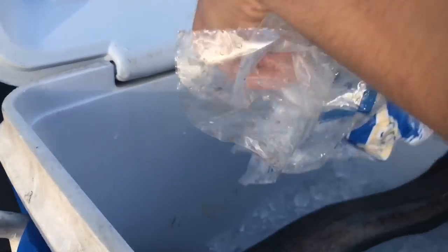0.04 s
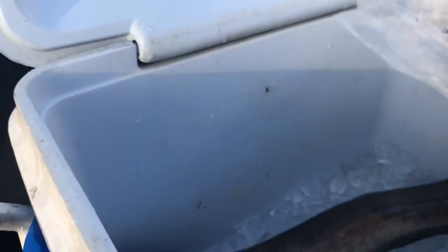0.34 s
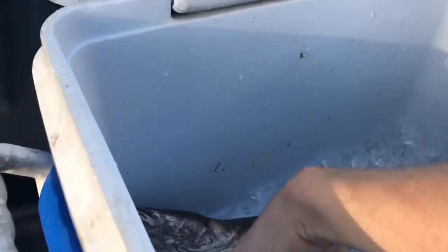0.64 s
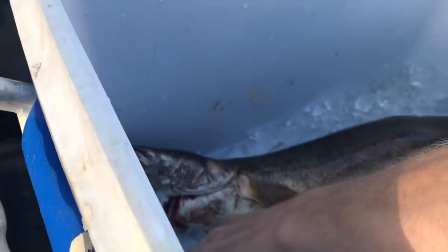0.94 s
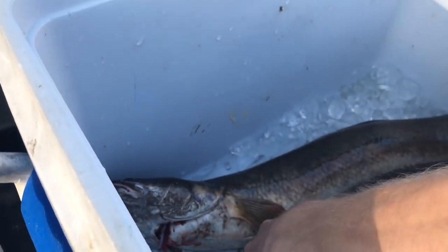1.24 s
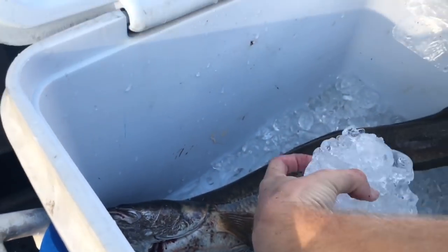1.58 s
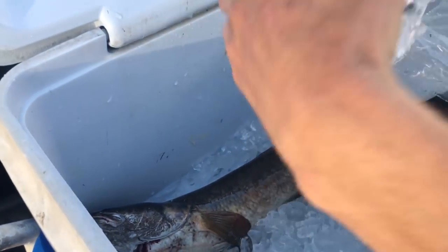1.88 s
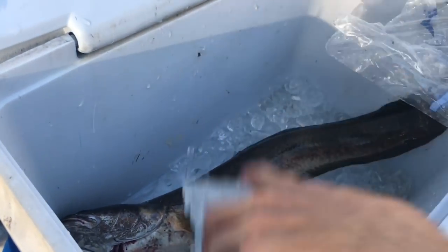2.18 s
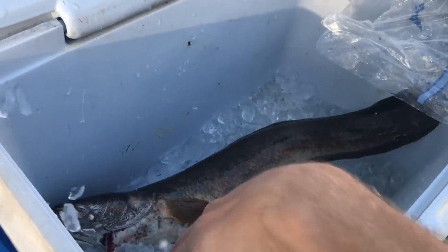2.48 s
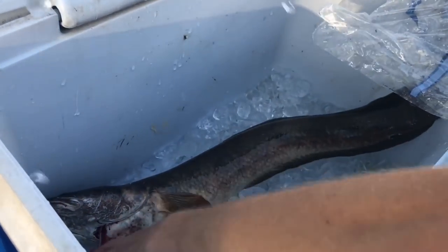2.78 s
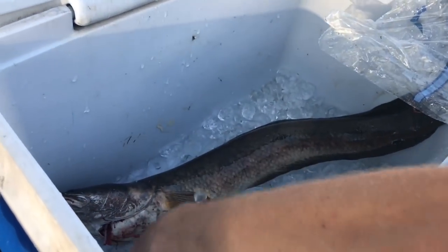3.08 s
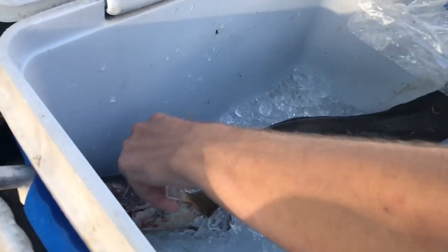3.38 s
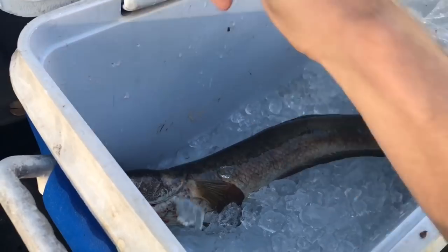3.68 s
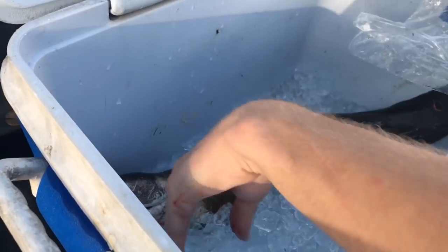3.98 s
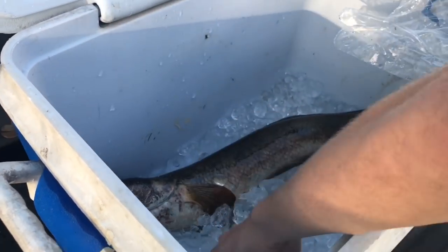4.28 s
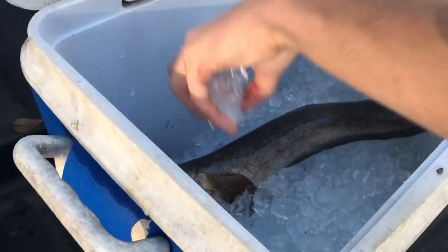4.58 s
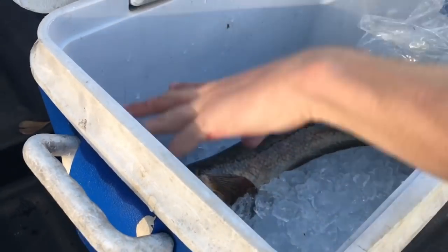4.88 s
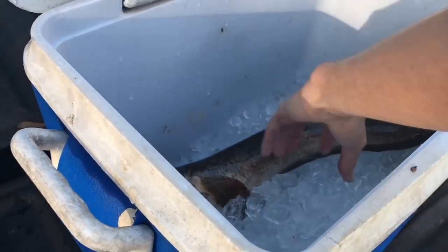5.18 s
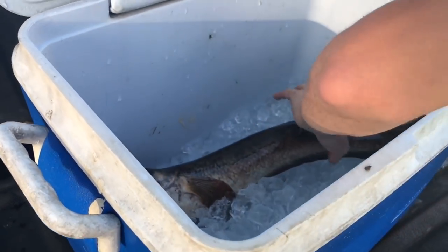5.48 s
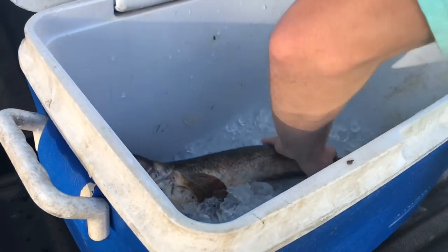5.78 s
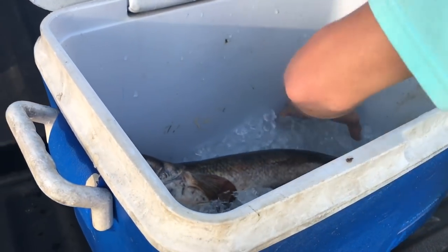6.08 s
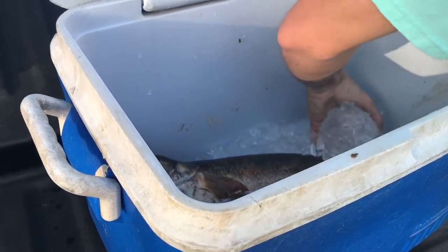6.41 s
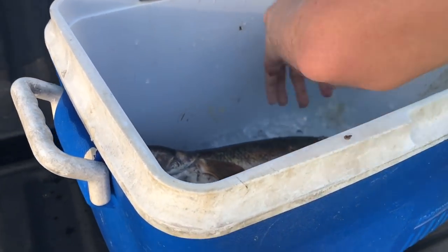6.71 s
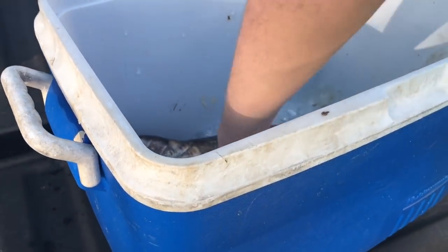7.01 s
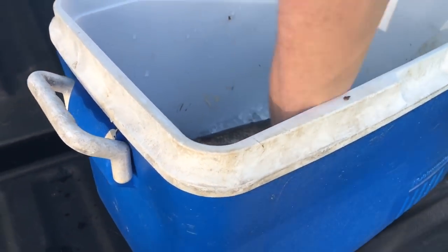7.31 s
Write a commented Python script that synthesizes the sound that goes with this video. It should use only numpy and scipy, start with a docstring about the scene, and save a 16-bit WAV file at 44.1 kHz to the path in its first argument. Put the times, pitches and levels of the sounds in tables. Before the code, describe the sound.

A hand scoops wet ice cubes in a plastic cooler, heard from close above, outdoors. In the first second an ice bag gives a few light crinkling ticks, and a low hum and airy rush fade by about 2 seconds, leaving faint open air. Crunchy digging starts near 0.4 seconds and grows around 1.1, with soft knocks on the tub. At 2.3 seconds a handful lands with a sharp clatter and a hollow thump, and loose cubes clink and skitter through more crunching until about 3.2. A second handful hits just before 4 seconds with the heaviest thump. After a short scoop, a third lands at 4.9. Following a brief lull, digging resumes from about 5.6 seconds to the end at roughly 7.5, in repeated, slightly hollower crunching strokes with scattered clinks and dull bumps on the plastic.

```python
"""Wet ice cubes, scooped by hand in a plastic cooler; three handfuls are tossed over a fish.
The bed crunches in thousands of small contacts, single cubes clink, and the hollow tub knocks
under the weight. Bright ticks come first from the crinkling ice bag, then from splitting chips.
Behind it: open air, with a low hum and a rush that fade in the first two seconds."""
import sys
import numpy as np
from scipy import signal
from scipy.fft import rfft, irfft
from scipy.io import wavfile

SR = 44100
rng = np.random.default_rng(int(sys.argv[2]) if len(sys.argv) > 2 else 0)


def unload_wav(signal):
    """Save mono or channel-first audio to the path in sys.argv[1] as 16-bit WAV at rate SR, clipped to [-1, 1]."""
    wavfile.write(
        sys.argv[1],
        SR,
        np.round(np.clip(np.atleast_2d(signal).T, -1, 1) * 32767).astype(np.int16),
    )


N = 328545
TIME_S = np.arange(N) / SR

# background spectra: f/Hz, level/dB
AIR_SPECTRUM = [(15, -21), (50, -4.5), (152, -5), (437, -21), (1280, -22.5), (4950, -40), (15800, -45)]
RUSH_SPECTRUM = [(40, -31), (130, -4.5), (430, -10.5), (1600, -10.5), (4000, -24), (16000, -39)]
# hand strokes, on the bag, then in the ice:
# t/s, rise/s, length/s, crunch/dB, fizz/dB re crunch, push on the tub/dB re crunch
STROKES = [(0, 0.0043, 0.027, -42.5, 2, -3), (0.378, 0.072, .13, -32, -5.5, -6.5),
           (0.853, 0.012, 0.14, -33, -8, -3), (1.094, 0.079, 0.16, -26, -2.5, -2.5),
           (1.382, 0.051, 0.048, -29.5, -4.5, 2.5), (1.48, 0.016, 0.17, -43, -1.5, 1.5),
           (2.365, 0.15, 0.34, -33.5, -4, -3), (2.55, 0.017, 0.33, -32.5, -16, -7.5),
           (2.859, 0.016, 0.053, -22.5, -14.5, -11), (2.958, 0.045, 0.12, -26.5, -6, -4.5),
           (3.102, 0.039, 0.089, -34.5, -4, 0), (3.97, 0.015, 0.59, -47.5, -3.5, 4.5),
           (4.352, 0.14, 0.058, -25.5, -9, -1), (5.084, 0.023, 0.05, -42.5, -6, -9),
           (5.311, 0.13, 0.098, -43, -11, -16), (5.644, 0.019, 0.055, -29, -4.5, -6.5),
           (5.767, 0.073, 0.13, -27.5, -3.5, -2.5), (6.126, 0.016, 0.085, -23.5, -6.5, -4),
           (6.297, 0.11, 0.15, -26, -6, -3), (6.483, 0.028, 0.19, -33, -0.5, -0.5),
           (6.675, 0.0087, 0.12, -26, -10, 0), (7.109, 0.03, 0.086, -25, -13, -3),
           (7.273, 0.28, 0.15, -25.5, -8, -5)]
# filters for coarse and fine ice contacts: f/Hz, gain/dB
CRUNCH_EQ = [(200, -12.5), (400, -11.5), (750, 0.5), (1500, 1), (2800, 1.5), (4500, -3.5), (6500, -4.5),
             (8000, -19), (11000, -21), (16000, -90)]
FIZZ_EQ = [(4000, 5.5), (7000, -2), (9000, -1), (10400, -6), (12000, -3.5), (15800, -5.5)]
# tub modes: f/Hz, level/dB, t60/s
TUB_MODES = [(66.7, 4.5, 0.24), (126, 4.5, 0.12), (159, 6.5, 0.087), (204.7, 4.5, 0.13), (228, 4.5, 0.13),
             (267.3, 5, 0.058), (303.5, 3.5, 0.087), (372, -1.5, 0.2), (426, 2, 0.2), (733, -3.5, 0.39),
             (925, -14, 0.1), (1300, 0.5, 0.14)]
# ticks of bag and chips: t/s, level/dB
TICKS = [(0.037, -33), (0.186, -46), (0.29, -36), (0.585, -36), (0.648, -30), (0.725, -26), (2.222, -32.5),
         (2.241, -27.5), (2.563, -18), (2.652, -28), (3.145, -26), (3.248, -35.5), (3.467, -40.5),
         (3.509, -39.5), (3.833, -47), (3.89, -34), (4.143, -32), (6.082, -34.5), (6.742, -21.5)]
# cubes striking or cracking: t/s, level/dB, ring f/Hz, snap sharpness/dB
CLINKS = [(0.528, -28, 3800, -26), (0.54, -27.5, 4500, -14), (0.642, -25, 4230, -4.5),
          (0.712, -25.5, 8900, -6), (1.115, -19.5, 3750, -26), (1.152, -18.5, 5450, -6),
          (1.407, -22.5, 4340, -7), (1.66, -27, 2450, -11.5), (1.679, -25, 3100, -24.5),
          (1.707, -30, 4650, -10), (1.747, -27, 3060, -12), (1.972, -44, 1470, -10),
          (2.329, -10.5, 1980, -16), (2.451, -24, 2420, -29), (2.462, -21, 2580, -34),
          (2.485, -16.5, 4700, -9.5), (2.55, -21.5, 3650, -14), (2.588, -19, 4340, -8),
          (2.6, -14.5, 2250, -12.5), (2.613, -26, 3600, -10), (2.67, -14.5, 4900, -13),
          (2.682, -22, 4140, -25), (2.694, -15, 4320, -12), (2.71, -21.5, 5500, -5), (2.727, -22, 4800, -3),
          (2.74, -15, 3100, -17), (2.774, -18, 3240, -18), (2.779, -23.5, 3020, -3), (2.8, -22, 2250, -13),
          (2.844, -22, 2430, -14), (2.86, -14.5, 1640, -14), (2.866, -17, 4170, -18),
          (2.882, -22.5, 1720, -5), (3.026, -17.5, 3140, -15), (3.405, -37.5, 2280, -13),
          (3.87, -18.5, 2650, 1.5), (3.946, -8, 2330, -13), (4.084, -26.5, 2270, -21),
          (4.16, -31, 1970, -12), (4.209, -22.5, 2320, -8), (4.23, -30, 2800, -10),
          (4.248, -30.5, 2000, -11), (4.27, -26, 1600, -7), (4.32, -26.5, 3220, -10),
          (4.898, -8.5, 2900, -11.5), (4.962, -47, 3330, -18), (5.086, -30, 2650, -17),
          (6.492, -22, 3000, -5), (6.696, -19, 1700, -9), (6.799, -28, 5000, -16),
          (6.833, -26.5, 1900, -22), (7.111, -23, 1300, -23), (7.15, -17, 1540, -14)]
# blows on the tub: t/s, ring peak/dB, f/Hz of the struck spot, factor on the modes' t60
KNOCKS = [(0.883, -18.5, 232, 1.1), (1.085, -20, 220, 1.4), (1.262, -18, 263, 2.1),
          (1.405, -12.5, 225, 1.4), (1.676, -26.5, 666, 0.36), (2.319, -7.5, 230, 0.16),
          (2.336, -5.5, 178, 2.6), (2.382, -14.5, 64, 0.74), (2.862, -16, 1010, 0.13),
          (3.052, -17, 243, 2.5), (3.871, -19, 950, 0.27), (3.948, -2, 162, 1.9), (3.952, -6.5, 295, 0.72),
          (4.894, -19.5, 74, 1.8), (4.898, -10.5, 282, 0.86), (4.916, -10, 237, 1.6),
          (4.963, -13.5, 960, 0.35), (5.816, -18.5, 174, 0.6), (6.193, -13.5, 625, 0.37),
          (6.677, -15, 420, 1.8), (6.796, -13, 232, 0.5), (7.16, -19, 720, 0.38)]
# handfuls landing: t/s, level/dB, rise/s, hold/s, t60/s
HANDFULS = [(2.3256, -13, 0.0032, 0.0088, 0.39), (3.94, -18, 0.0075, 0.0048, 0.44),
            (4.8873, -17.5, 0.00091, 0.013, 0.21)]


def amp(db):
    """Decibels to gain."""
    return 10 ** (np.asarray(db) / 20)


def unit(x):
    """Scales to rms 1."""
    return x / np.sqrt(np.mean(x ** 2) + 1e-20)


def add(mix, at_s, sound):
    """Mixes a sound in."""
    part = mix[max(round(at_s * SR), 0):][:len(sound)]
    part += sound[:len(part)]


def decay(age_s, t60_s):
    """Exponential fall, 60 dB per t60."""
    return np.exp(-np.log(1000) * age_s / t60_s)


def colour(x, points, size=4096):
    """Minimum-phase filter through (f/Hz, gain/dB) points; attacks stay sharp."""
    hz, db = np.transpose(points)
    bin_hz = abs(np.fft.fftfreq(size, 1 / SR))
    log_gain = np.log(amp(np.interp(np.log(bin_hz + 1), np.log(hz + 1), db)))
    taps = np.fft.ifft(np.exp(np.conj(signal.hilbert(log_gain)))).real
    return signal.oaconvolve(x, taps[:size // 2])[:len(x)]


def wander(band_hz):
    """Smooth random curve, rms 1."""
    lowpass = np.exp(-(np.fft.rfftfreq(N, 1 / SR) / band_hz) ** 2)
    return unit(irfft(rfft(rng.standard_normal(N)) * lowpass, N))


def swell(at_s, peak_db, width_s, fall_db):
    """Level in dB: one peak, then an ever slower fade."""
    return peak_db - fall_db * np.log10(1 + ((TIME_S - at_s) / width_s) ** 2)


def ring(hz, t60_s, count):
    """One damped mode."""
    t = np.arange(count) / SR
    return np.sin(2 * np.pi * hz * t) * decay(t, t60_s)


def outdoors(hum_hz=65):
    """Low, uneven open air; a rush and a wavering hum fade away."""
    air = amp(-44.5 + wander(6.1)) * unit(colour(rng.standard_normal(N), AIR_SPECTRUM))
    rush_db = swell(at_s=-0.33, peak_db=-33.5, width_s=0.98, fall_db=19.5) + wander(28)
    rush = unit(colour(rng.standard_normal(N), RUSH_SPECTRUM))
    turns = np.cumsum(hum_hz * (1 + 0.0422 * wander(9.13))) / SR
    hum = unit(np.sin(2 * np.pi * turns) + 0.66 * np.sin(4 * np.pi * turns))
    hum_db = swell(at_s=0.93, peak_db=-37, width_s=0.5, fall_db=11) + 2 * wander(12)
    return air + amp(rush_db) * rush + amp(hum_db) * hum


def stroke_levels(release_t60_s=0.39, settle_t60_s=0.88, rest_db=(-64, -67.5, -66.5)):
    """Crunch, fizz and push in dB: each stroke builds, holds and lets go, then the bed settles."""
    t = TIME_S[::64]
    crunch, fizz, push = (np.full(len(t), amp(db) ** 2) for db in rest_db)
    for start_s, rise_s, length_s, db, fizz_db, push_db in STROKES:
        press = amp(db) * (1 + np.tanh(2 * (t - start_s) / rise_s)) / 2
        after_s = np.maximum(t - start_s - length_s, 0)
        release, settle = decay(after_s, release_t60_s), decay(after_s, settle_t60_s)
        coarse = press * np.maximum(release, amp(-14.5) * settle)
        fine = press * np.maximum(release, amp(-5) * settle)  # settling is richer in fine chips
        crunch += coarse ** 2
        fizz += (amp(fizz_db) * fine) ** 2
        push += (amp(push_db) * coarse) ** 2
    return [np.interp(TIME_S, t, 10 * np.log10(power)) for power in (crunch, fizz, push)]


def walls(x, wet_db=-4, t60_s=0.058, count=4000):
    """Quick echoes off the close plastic walls, different for each spot."""
    t = np.arange(count) / SR
    taps = rng.standard_normal(count) * (rng.random(count) < 0.12)
    taps *= (t > 0.0012) * decay(t, t60_s)
    taps *= amp(wet_db) / np.linalg.norm(taps)
    taps[0] = 1
    return signal.oaconvolve(x, taps)[:len(x)] / np.linalg.norm(taps)


def contacts(per_s, spread_db, band_hz, cycles, sizes=24):
    """Ice chips of many sizes collide and ring briefly; most hits are light, a few hard."""
    force = amp(spread_db * np.minimum(rng.exponential(1, N), 4)) * rng.choice([-1, 1], N)
    force *= (rng.random(N) < per_s / SR) / np.sqrt(per_s)
    chip_size, out = rng.integers(0, sizes, N), np.zeros(N)
    for size, hz in enumerate(np.linspace(*np.sqrt(band_hz), sizes) ** 2):
        tone = ring(hz, cycles / hz, count=3000)
        tone /= np.linalg.norm(tone)
        tone[0] += 0.6  # bare contact tick
        out += signal.oaconvolve(force * (chip_size == size), walls(tone))[:N] * hz ** 0.25
    return out


def tumbling(stir, max_per_s=260, spread_db=2.5, count=1500):
    """Whole cubes grind past each other under a hard push: short scrapes, each with its own pitch."""
    out, t = np.zeros(N), np.arange(count) / SR
    for when, pitch, force, chance in rng.random((int(max_per_s * N / SR), 4)):
        hz = 1000 * 6 ** pitch
        scrape = rng.standard_normal(count) * np.exp(-t / 0.0036)
        tone = signal.fftconvolve(scrape, ring(hz, 15 / hz, count))[:count]
        slips = chance < stir[int(when * N)] ** 2
        gain = slips * amp(-spread_db * np.log(1.04 - force))
        add(out, when * N / SR, gain * (unit(tone) + 0.76 * unit(scrape)))
    return unit(walls(out))


def tub_ring(weights, t60_factor=1, count=12000):
    """Tub modes in alternating polarity; the wall takes a moment to move."""
    modes = sum((-1) ** k * weight * amp(db) * ring(hz, t60_s * t60_factor, count)
                for k, (weight, (hz, db, t60_s)) in enumerate(zip(weights, TUB_MODES)))
    return modes * (1 - np.exp(-np.arange(count) / SR / 0.00034))


def modes_near(spot_hz, width_oct):
    """Mode weights: a struck spot favours modes near its own frequency."""
    mode_hz = np.transpose(TUB_MODES)[0]
    return 1 / (1 + (np.log2(mode_hz / spot_hz) / width_oct) ** 2)


def driven_tub(drive, response, drift):
    """The tub rings under a running drive; the shifting load makes its pitch drift."""
    ringing = signal.oaconvolve(drive, response)[:N]
    position = np.cumsum(1 + drift * wander(3)) % N
    return unit(np.interp(position, np.arange(N), ringing))


def digging():
    """Harder stirring makes more contacts a second; the bed passes its jolts to the tub."""
    crunch_db, fizz_db, push_db = stroke_levels()
    stir = np.clip(amp(0.55 * (crunch_db + 21.5)), 0.12, 1)
    slip_db = wander(32)  # cubes catch and let go in clumps
    coarse = contacts(per_s=5500 * stir, spread_db=3.1, band_hz=(437, 9200), cycles=29.6)
    crunch = unit(unit(colour(coarse, CRUNCH_EQ)) + amp(-7) * tumbling(stir))
    fine = contacts(per_s=5000 * stir, spread_db=1.63, band_hz=(6000, 15600), cycles=23)
    fizz = unit(colour(fine, FIZZ_EQ))
    jolts = rng.standard_normal(N) * (rng.random(N) < 700 / SR)
    rumble = driven_tub(jolts, tub_ring(modes_near(240, width_oct=0.52)), drift=0.06)
    upper_modes = [hz > 350 for hz, _, _ in TUB_MODES]
    hollow = driven_tub(crunch, tub_ring(upper_modes, t60_factor=0.38), drift=0.02)
    hollow_db = swell(at_s=6, peak_db=-8, width_s=0.62, fall_db=10)  # hand in the deep far end
    ice = amp(crunch_db + slip_db) * (crunch + amp(hollow_db) * hollow)
    return ice + amp(fizz_db + 4 + slip_db / 2) * fizz + amp(push_db) * rumble


def settling(level_db=-57):
    """The melting bed shifts in faint, crisp ticks."""
    ticks = contacts(per_s=24, spread_db=4.4, band_hz=(2400, 21000), cycles=1.1, sizes=8)
    return amp(level_db) * unit(ticks)


def clinks(tick_hz=5160, tick_sharp_db=-1, trim_db=-11, count=3500):
    """A cube snaps, chatters, rebounds once and rings briefly; ticks are bright, dry snaps."""
    out, t = np.zeros(N), np.arange(count) / SR
    ticks = [(at_s, db, tick_hz, tick_sharp_db) for at_s, db in TICKS]
    for at_s, db, hz, sharp_db in CLINKS + ticks:
        chatter = rng.standard_normal(count) * np.exp(-t / 0.0029)
        chatter *= 1 - 1.4 * np.exp(-t / 0.00037)
        chatter[0] += 2.8  # first contact
        rebound_s = rng.uniform(0.0014, 0.0082)
        add(chatter, rebound_s, 0.5 * chatter)
        # little radiates below the ring; a sharp crack reaches far above it
        snap = colour(chatter, [(hz / 8, -22), (hz / 2, -5), (hz, 0), (min(1.19 * hz, 10000), 0),
                                (11000, sharp_db - 3), (16000, sharp_db - 3.5)])
        tone = signal.oaconvolve(chatter, ring(hz, 14 / hz, count))[:count]
        ring_db = -14 - 0.5 * sharp_db  # blunt blows ring more
        cube = walls(unit(snap) + amp(ring_db) * unit(tone), wet_db=-13, t60_s=0.1)
        add(out, at_s, amp(db + trim_db) * unit(cube))
    return out


def knocks(slap_tau_s=0.0033, count=2500):
    """Each blow slaps dully and rings the tub modes that suit the spot; the ice damps them."""
    out, t = np.zeros(N), np.arange(count) / SR
    for at_s, db, spot_hz, t60_factor in KNOCKS:
        body = tub_ring(modes_near(spot_hz, width_oct=0.48), t60_factor)
        burst = rng.standard_normal(count) * np.exp(-t / slap_tau_s)
        slap = colour(burst, [(spot_hz / 3, -20), (spot_hz, 0), (2 * spot_hz, -6), (8 * spot_hz, -45)])
        slap_db = db + 1.5 - 13 * t60_factor  # soft, free-ringing blows slap less
        add(out, at_s, amp(db) * body / abs(body).max())
        add(out, at_s, amp(slap_db) * slap / abs(slap).max())
    return out


def handfuls(first_share=0.39):
    """A clump of cubes hits abruptly, clatters as the rest arrives, and settles."""
    coarse = contacts(per_s=3500, spread_db=0.61, band_hz=(446, 6940), cycles=8.1)
    fine = contacts(per_s=2400, spread_db=0.74, band_hz=(6320, 15800), cycles=46)
    clatter = unit(colour(coarse, CRUNCH_EQ)) + amp(-3.5) * unit(colour(fine, FIZZ_EQ))
    out = np.zeros(N)
    for at_s, db, rise_s, hold_s, t60_s in HANDFULS:
        age_s = np.maximum(TIME_S - at_s, 0)
        arrive = (TIME_S > at_s) * (1 - (1 - first_share) * np.exp(-(age_s / rise_s) ** 2))
        fall = decay(np.maximum(age_s - hold_s, 0), t60_s)
        out += amp(db) * arrive * fall * clatter
    return out


def scene():
    """Mono mix above the cooler."""
    return (digging() + settling() + clinks() + handfuls() + knocks() + outdoors())[None]


def record(dry):
    """Small microphone: bass cut, rounded peaks, band limit."""
    low_hz, high_hz = 38, 15900
    thin = signal.sosfilt(signal.butter(2, low_hz, "highpass", fs=SR, output="sos"), dry)
    rounded = thin / (1 + thin ** 6) ** (1 / 6)
    lowpass = signal.firwin(511, high_hz, window=("kaiser", 9), fs=SR)
    return signal.oaconvolve(rounded, lowpass[None], "same")


dry = scene()
out = record(dry)
unload_wav(out)
```